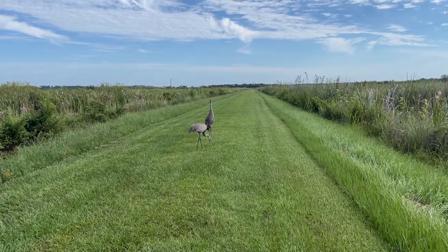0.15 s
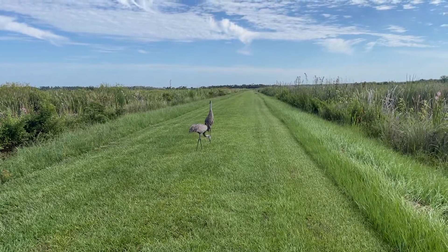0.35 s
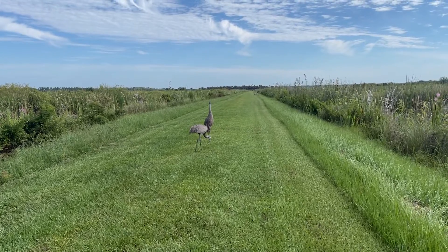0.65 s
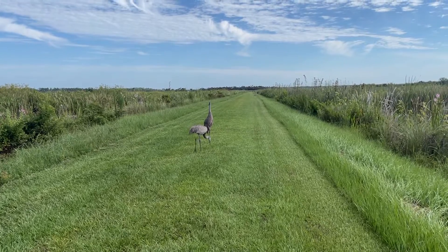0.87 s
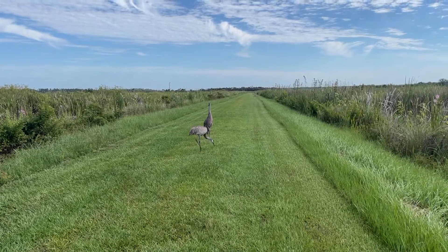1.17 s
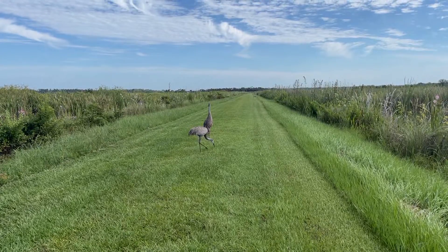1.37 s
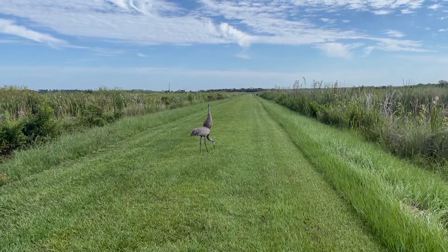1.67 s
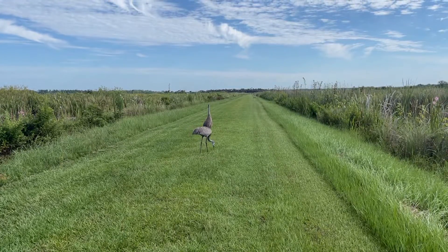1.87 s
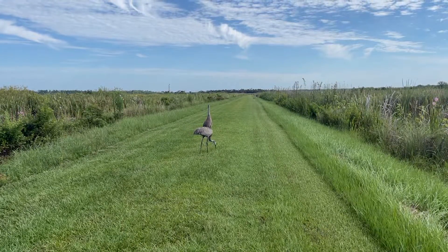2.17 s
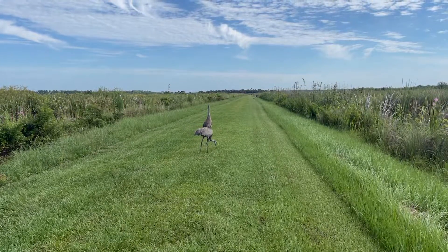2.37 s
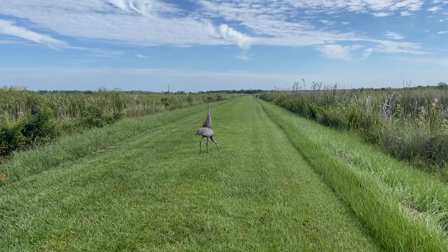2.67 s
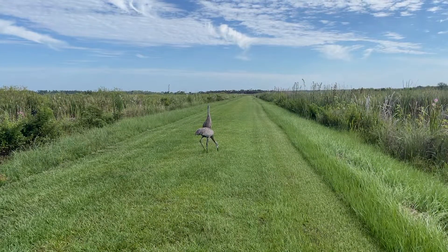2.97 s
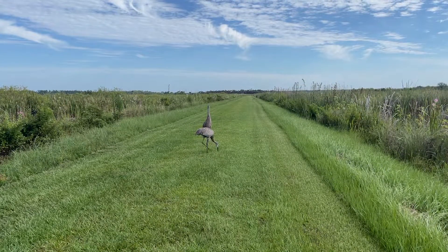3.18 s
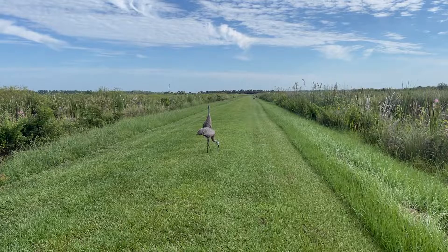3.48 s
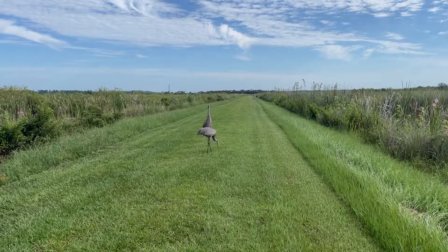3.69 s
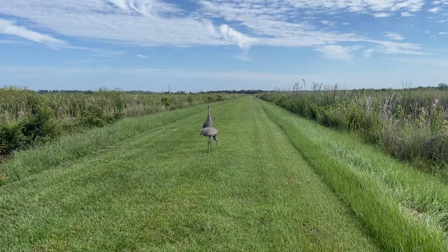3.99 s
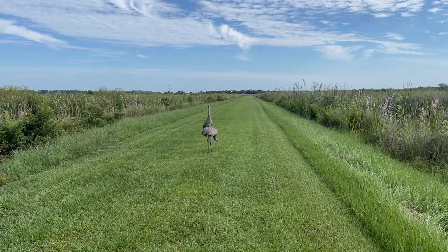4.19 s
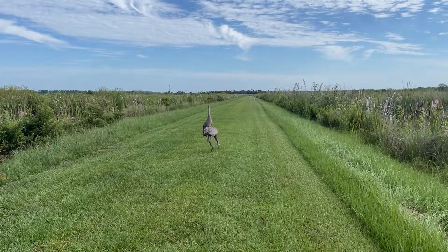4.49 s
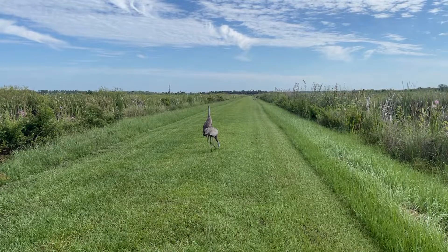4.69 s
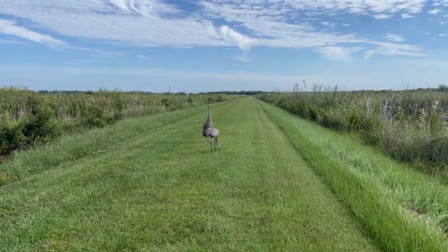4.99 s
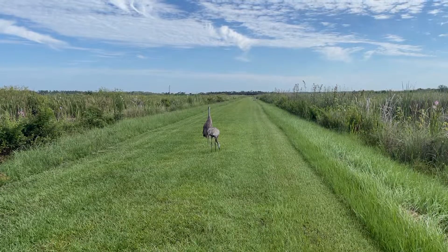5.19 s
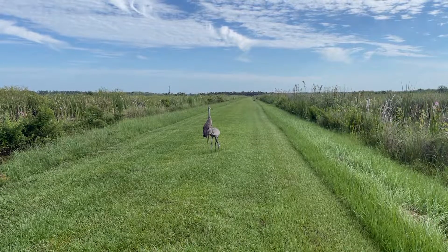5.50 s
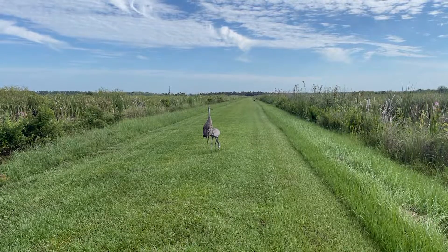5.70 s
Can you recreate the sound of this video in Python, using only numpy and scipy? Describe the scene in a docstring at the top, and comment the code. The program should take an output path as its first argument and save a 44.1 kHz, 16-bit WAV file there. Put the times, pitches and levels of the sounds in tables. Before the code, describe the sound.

In an open marsh, a katydid keeps up a high, fast drone while others buzz and tick over a soft hiss and the low rumble of far traffic. Small birds twitter and blackbirds whistle early on, followed by faint peeps. Near the end come clearer whistles, a raspy trill and one brief frog grunt. A phone picks it all up in stereo.

```python
"""Katydids on a marsh dyke

One katydid (a bush cricket) drones by scraping its wings in fast, gliding strokes; others buzz and tick.
Blackbirds whistle and trill, small birds peep and twitter, and a frog's throat pulses in one grunt.
Far traffic rumbles under the hiss of air and distant insects. Reeds and grass add short echoes.
A phone hears it all in stereo. The drone drops out briefly twice, the second time with a dry click."""
import sys
import numpy as np
from scipy import signal
from scipy.fft import rfft, irfft
from scipy.io import wavfile
from scipy.ndimage import uniform_filter1d

SR = 44100
rng = np.random.default_rng(int(sys.argv[2]) if len(sys.argv) > 2 else 0)


def to_wav(s):
    """Save 16-bit WAV."""
    ch = np.atleast_2d(s).T  # columns
    pcm = np.round(np.clip(ch, -1, 1) * 32767)  # PCM
    wavfile.write(sys.argv[1], SR, pcm.astype(np.int16))


N = 257984
T = np.arange(N) / SR
FREQ_HZ = np.arange(N // 2 + 1) * SR / N


def undb(db):
    """Turn decibels into a number to multiply by."""
    return 10 ** (np.asarray(db) / 20)


def level(x, db):
    """Scale a sound to an average (rms) level."""
    return x * undb(db) / np.sqrt(np.mean(x ** 2))


def curve(rows, at=T):
    """Join the rows of a table with straight lines, looked up by its first column."""
    points, *columns = np.transpose(rows)
    return [np.interp(at, points, column) for column in columns]


def ring(x, hz, width_hz):
    """A resonance: it keeps the sound near one pitch."""
    return signal.lfilter(*signal.iirpeak(hz, hz / width_hz, fs=SR), x)


def ring_twice(x, hz, width_hz):
    """A resonance with steeper sides."""
    return ring(ring(x, hz, width_hz), hz, width_hz)


def wander(rate_hz):
    """A smooth random wobble, about 1 in size."""
    hold = int(SR / rate_hz)
    steps = np.repeat(rng.standard_normal(N // hold + 1), hold)
    return 1.8 * uniform_filter1d(uniform_filter1d(steps, hold), hold)[:N]


def swell(peak_s, rise_s, fall_s, blunt=1.9):
    """One bell-shaped rise and fall; blunt flattens the top."""
    return np.exp(-np.abs((T - peak_s) / np.where(T < peak_s, rise_s, fall_s)) ** blunt)


def pulsing(rate_hz, sharp, start):
    """Repeating rounded pulses, from 0 to 1."""
    cycles = np.cumsum(rate_hz) / SR + start
    return (.5 - .5 * np.cos(2 * np.pi * cycles)) ** sharp


def flickering_noise(spectrum, flicker_db, rate_hz):
    """Two unrelated noises of one colour; each third of an octave flickers on its own."""
    hz, db = np.transpose(spectrum)
    octave = np.log2(FREQ_HZ + 1)
    colour = undb(np.interp(octave, np.log2(hz), db, left=-90, right=-90))
    noise = rfft(rng.standard_normal((2, N))) * colour
    out = 0
    for centre in np.arange(np.log2(hz[0]), np.log2(hz[-1]) + 1 / 3, 1 / 3):
        share = np.clip(1 - 3 * abs(octave - centre), 0, 1)
        out = out + undb(flicker_db * wander(rate_hz)) * irfft(noise * share, N)
    return level(out, 0)


def reed_echo(x, fade_s, wet_db):
    """The echo alone, scattered by reeds and grass; it drops 60 dB in fade_s."""
    t = T[:SR // 2]
    tail = rng.standard_normal((2, len(t))) * np.exp(-np.log(1000) * t / fade_s)
    tail *= undb(wet_db) / np.sqrt(np.sum(tail ** 2, axis=1, keepdims=True))
    return signal.fftconvolve(x, tail, axes=1)[:, :N]


def spread_to_stereo(main, unrelated):
    """The left side gets main; the right gets it out of step, mixed with unrelated sound."""
    # How alike left and right sound, and how far out of step, at each pitch:
    # pitch_hz, likeness (0-1), right_lead_radians, left_minus_right_db
    stereo_match = [(20, .9, .05, 1), (170, .96, .42, 1.6), (300, .9, 1.15, -.5), (520, .62, 1.9, -1.5),
                    (900, .45, 2.9, -2), (1300, .25, 2.9, 0), (2000, .3, 5.8, 0), (4000, .3, 6, 0),
                    (5500, .35, 6.6, 2), (6500, .2, 7.5, 0), (7100, .6, 8.9, 0), (7700, .999, 9.425, 0),
                    (8650, .999, 9.425, 0), (9150, .8, 10.2, 0), (9500, .93, 10.8, 0),
                    (10500, .93, 11.75, 0), (10950, 1, 12.566, 0), (12400, 1, 12.566, 0),
                    (13200, .5, 14.1, 0), (13650, .8, 15.3, 0), (14000, .999, 15.708, 0),
                    (16000, .999, 15.708, 0)]
    likeness, lead, pan_db = curve(stereo_match, FREQ_HZ)
    left = rfft(main)
    right = likeness * left * np.exp(1j * lead) + np.sqrt(1 - likeness ** 2) * rfft(unrelated)
    return irfft(np.array([left * undb(pan_db / 2), right * undb(-pan_db / 2)]), N)


def bird_tone(size, hz, pan_db):
    """A tone of moving pitch that reaches the microphones out of step; positive pan_db is left."""
    # How far the right side is ahead: pitch_hz, right_lead_radians
    leads = [(1600, 1.14), (1900, 8.6), (2300, 6.54), (3000, 4.83), (3300, 1.9), (3600, 4.76), (5000, 5.7)]
    phase = 2 * np.pi * np.cumsum(hz) / SR
    left = undb(pan_db / 2) * np.sin(phase)
    right = undb(-pan_db / 2) * np.sin(phase + curve(leads, hz)[0])
    return size * np.array([left, right])


def traffic():
    """Far traffic: a low rumble that slowly swells."""
    # Colour of the rumble: pitch_hz, relative_db
    spectrum = [(12, -46.5), (20, -29), (37, -7), (59, -4), (171, -2.5), (184, -4), (219, -18.5),
                (310, -16), (333, -16.5), (376, -25), (410, -26), (489, -25.5), (646, -36), (840, -42),
                (1300, -52), (1690, -60), (2860, -120)]
    # Its swell: time_s, level_db
    loudness = [(0, -51), (1.3, -50), (1.7, -49), (3.4, -48), (3.58, -50), (3.75, -46), (3.9, -48),
                (5.0, -48.5), (5.85, -50)]
    rumble = flickering_noise(spectrum, flicker_db=.93, rate_hz=6)
    return rumble * undb(curve(loudness)[0] + .35 * wander(5.08))


def hiss():
    """Air and distant insects blend into a hiss."""
    # Colour of the hiss: pitch_hz, relative_db
    spectrum = [(600, -8), (900, -10), (1200, -14.5), (1800, -15.5), (2300, -6.5), (2800, -3.5),
                (3300, -5.5), (3900, -6), (4400, -3.5), (4900, -3), (5500, 0), (6000, -0.5), (6700, -3),
                (7800, -6), (9000, 2), (10500, 6), (11500, -0.5), (12400, -1.5), (13000, -4), (13700, -4),
                (14500, -7), (16000, 0.5)]
    return flickering_noise(spectrum, flicker_db=.9, rate_hz=14) * undb(-60.5)


def click():
    """One dry click, like a cut in the sound: the signal steps down and recovers."""
    start_s, recovery_s = 2.5447, .003
    step = -undb(-42) * (T >= start_s) * np.exp(-np.abs(T - start_s) / recovery_s)
    return signal.sosfilt(signal.butter(2, 8000, fs=SR, output="sos"), step)


def twitter():
    """A far bird's pairs of chirps, one falling and one rising, sink and speed up over a softer note."""
    # The two chirps: middle_cycles, drift_cycles_per_s, half_length_cycles, sweep_hz
    pair = [(.79, .13, .17, -1300), (.34, -.09, .22, 950)]
    bout = swell(peak_s=.6, rise_s=.8, fall_s=.72, blunt=2.4) * undb(-63.5)
    pairs_per_s, centre_hz = 10.25 + 1.75 * T, 5170 - 290 * T
    cycles = np.cumsum(pairs_per_s) / SR
    dry = 0
    for middle, drift, half, sweep_hz in pair:
        turns = cycles - middle - drift * T + 1.5
        place = np.clip((turns % 1 - .5) / half, -1, 1)  # -1 to 1 through each chirp
        size_luck, pitch_luck = rng.standard_normal((N // 1000, 2))[turns.astype(int)].T
        size = bout * undb(1.46 * size_luck) * (1 - place ** 2)
        chirp_hz = centre_hz + 70 * pitch_luck + sweep_hz * place / 2 + 130 * wander(900)
        low_note = bird_tone(size * undb(-8), 2950 + 70 * wander(600), pan_db=-4)
        dry = dry + bird_tone(size, chirp_hz, pan_db=2.7) + low_note
    return dry + reed_echo(dry, fade_s=.28, wet_db=-1.5)


def peeps(rough):
    """A far bird peeps, each note sliding upward."""
    # The peeps: peak_s, pitch_hz
    notes = [(2.28, 2330), (2.492, 2340), (2.676, 2350), (2.505, 2640), (2.7, 2780), (2.81, 2900),
             (2.898, 2570), (3.11, 2370), (3.326, 2330), (3.55, 2600), (3.768, 2310)]
    out = 0
    for (peak_s, hz), db in zip(notes, rng.normal(-72.5, 1, len(notes))):
        pitch_hz = hz + 6000 * np.clip(T - peak_s, -.03, .03) + 40 * rough
        out += bird_tone(undb(db) * swell(peak_s, .011, .011), pitch_hz, pan_db=-1.6)
    return out


def chucks(rough):
    """Bird notes so short that they sound like "chuck"."""
    # The calls: peak_s, level_db, pitch_hz, rise_s
    calls = [(4.003, -65, 2620, 0.0062), (3.998, -68.5, 1706, 0.0092), (4.105, -66, 990, .003),
             (4.429, -54, 2200, .003), (4.446, -56, 2165, 0.0035), (4.463, -57, 2150, 0.0035),
             (4.503, -55.5, 3780, 0.002), (4.781, -54, 5530, 0.0032), (5.648, -73.5, 1770, 0.01)]
    return sum(bird_tone(undb(db) * swell(peak_s, rise_s, 1.6 * rise_s), hz + 60 * rough, pan_db=-1.6)
               for peak_s, db, hz, rise_s in calls)


def whistles(rough):
    """Blackbirds whistle almost pure tones that glide and waver."""
    # The notes: peak_s, rise_s, fall_s, pitch_hz, glide_hz_per_s, level_db, rasp_hz, left_minus_right_db
    notes = [(0.63, 0.031, 0.032, 1622, 501, -65, 5, -1), (.71, 0.0096, 0.016, 1410, -2000, -79.5, 20, -5),
             (0.801, .02, 0.04, 2575, 802, -55.5, 10, 0), (.8, .02, 0.036, 2355, -300, -68.5, 35, 6),
             (.893, 0.014, 0.055, 2997, -300, -60, 10.5, -5), (.886, .01, .035, 3340, 1000, -69.5, 39, 3),
             (1.02, .1, .4, 2990, -59.5, -73, 25, -7), (1.45, 0.014, 0.073, 2547, 501, -68.5, 26, -2),
             (1.46, 0.013, 0.031, 2260, 1, -73.5, 150, 2), (4.195, .028, 0.058, 2415, -200, -57, 5, 7.5),
             (4.31, 0.0092, .06, 2415, -400, -72.5, 10, -2), (4.322, 0.015, 0.014, 1536, 3499, -71, 10, -2),
             (4.53, 0.023, .035, 1735, 500, -71.5, 10, 0), (4.53, 0.02, 0.023, 3430, 600, -47, 8, 6),
             (4.547, .035, .03, 5170, 2001.5, -69, 40, 12), (4.615, 0.03, .02, 3420, 300.5, -63, 10, 0),
             (4.636, 0.03, 0.04, 2680, 300.5, -50, 8.6, 1), (4.725, .05, 0.04, 2760, 299, -61.5, 12, -1),
             (4.71, 0.048, 0.033, 5260, -1, -69.5, 41, 7), (4.72, .03, 0.028, 5000, 300.5, -70, 40, 4),
             (4.71, .03, 0.045, 3060, 1001, -66.5, 12, 0), (4.732, 0.011, 0.016, 3450, -500, -63.5, 20, 8),
             (5.307, .014, 0.015, 2660, -1, -54.5, 20, -1), (5.35, .03, 0.082, 2800, -1500, -73, 87, 0),
             (5.32, .015, .015, 3650, 0, -69, 90, 6), (5.4, .06, .12, 3550, 0, -75, 200, 4),
             (4.64, .03, .04, 2430, 299.5, -69, 60, 0), (4.56, .02, 0.016, 3800, 5001, -69, 40, 4)]
    waver = undb(.7 * wander(30))
    out = 0
    for peak_s, rise_s, fall_s, hz, glide, db, rasp_hz, pan_db in notes:
        pitch_hz = hz + glide * np.clip(T - peak_s, -2 * rise_s, 2 * fall_s) + rasp_hz * rough
        size = np.sqrt(2) * undb(db) * waver * swell(peak_s, rise_s, fall_s, blunt=2.6)
        out += bird_tone(size, pitch_hz, pan_db)
    return out


def trill():
    """A blackbird's raspy trill: fast pulses whose pitch rises, then droops."""
    # Its tones: pitch_ratio, relative_db, growth_db_per_s, rasp_share_of_pitch, left_minus_right_db
    tones = [(1, 0, 3, .018, -2.5), (1.18, -7, 10, .04, 6), (1.3, -12, 10, .04, 6), (1.72, -11, 8, .025, 4),
             (1.84, -7, 4, .018, 4)]
    start_s, top_s, end_s, edge_s = 4.77, 5.1, 5.295, .026
    from_top_s = np.clip(T, start_s, end_s) - top_s
    hz = 2994 - 1400 * from_top_s ** 2
    fade = np.clip(np.minimum(T - start_s, end_s - T) / edge_s, 0, 1)
    size = 2.1 * undb(-62 + 1.3 * wander(90)) * fade
    size *= pulsing(rate_hz=76.9 + 3 * wander(30), sharp=.8, start=.6)
    out = 0
    for ratio, db, growth, rasp, pan_db in tones:
        pitch_hz = ratio * hz * (1 + rasp * wander(1500))
        out += bird_tone(size * undb(db + growth * from_top_s), pitch_hz, pan_db)
    return out


def birds():
    """Whistles, peeps, chucks and the trill echo from the reeds."""
    rough = wander(500)  # a fast pitch wobble, heard as rasp
    dry = whistles(rough) + peeps(rough) + chucks(rough) + trill()
    return dry + reed_echo(dry, fade_s=.33, wet_db=-14.5)


def frog():
    """One grunt: pulses with a noisy rattle make the throat and its sac ring."""
    # Throat resonances: pitch_hz, width_hz, relative_db
    throat = [(322, 150, 2), (434, 140, -2), (710, 320, -22), (1300, 300, -17), (1960, 480, 1.5),
              (2200, 390, -5), (2750, 340, -2)]
    pulse_hz = 63
    cycles = pulse_hz * T + .32
    rattle = .2 * np.exp(-(cycles % 1) / .5) * rng.standard_normal(N)
    pulses = np.diff(np.floor(cycles), prepend=0) + rattle
    voice = sum(undb(db) * ring_twice(pulses, hz, width_hz) / width_hz for hz, width_hz, db in throat)
    grunt = level(voice, -52.5) * swell(peak_s=5.29, rise_s=.034, fall_s=.056)
    dry = np.array([np.roll(grunt, 20) * undb(-2), grunt * undb(2)])  # the right hears it first
    return dry + reed_echo(dry, fade_s=.17, wet_db=-8.5)


def katydid_ticks(noise):
    """Single wing strokes: short bursts of noise coloured by the ringing wing."""
    # The ticks: start_s, strength_db
    ticks = [(.38, -60), (.444, -58), (.509, -59), (.576, -58), (.638, -59), (.708, -59), (.782, -59),
             (.867, -57), (.958, -56), (1.127, -57), (1.197, -55), (1.267, -55.5), (1.339, -59),
             (5.102, -59), (5.173, -56), (5.242, -57), (5.305, -56), (5.372, -58), (5.438, -56),
             (5.511, -58), (5.576, -56.5), (5.652, -57)]
    rise_s, fall_s = .002, .012
    bursts = 0
    for start_s, db in ticks:
        age_s = np.maximum(T - start_s, 0)
        bursts += undb(db) * (1 - np.exp(-age_s / rise_s)) * np.exp(-age_s / fall_s)
    wing = ring_twice(noise, 12000, 8400) + undb(4) * ring(noise, 11700, 1300)
    return level(wing, 5.3) * bursts


def katydid_buzz(noise):
    """About 50 noisy strokes a second make another katydid's wings ring."""
    # How loud the buzz is: time_s, level_db
    loudness = [(0, -71), (.4, -70), (.75, -68), (1.1, -73), (1.4, -74), (1.7, -67.5), (2.5, -63),
                (3, -61.5), (3.5, -64.5), (4.2, -66.5), (4.65, -67.5), (4.85, -90), (5.4, -82), (5.85, -70)]
    wing = ring_twice(noise, 11660, 1500) + undb(-6.5) * ring_twice(noise, 12900, 1000)
    strokes = pulsing(rate_hz=49.87 + .15 * wander(.67), sharp=.61, start=.3)
    flicker = undb(.91 * wander(45))
    return level(wing * strokes * flicker, curve(loudness)[0])


def katydid_drone():
    """Each scrape of the near katydid's wing is a tone that glides up and down; far ones blur."""
    # Two brief dropouts where the sound cuts and the drone jumps: time_s, lost_cycles, dip_db
    dropouts = [(1.008, .255, -10), (2.545, .35, -1)]
    strokes_per_s, top_hz, sag_hz, level_db = 69.7, 10454, 1298, -55
    cycles = .835 + strokes_per_s * T + .126 * np.maximum(T - 4.5, 0)  # a little faster after 4.5 s
    cycles -= sum(lost * (T > time_s) for time_s, lost, _ in dropouts)
    place = np.clip((cycles % 1 - .52) / .36, -1, 1)  # -1 to 1 through each stroke
    pitch_luck, phase_luck, size_luck = rng.standard_normal((N // 400, 3))[cycles.astype(int)].T
    hz = (top_hz - sag_hz * place ** 2) * (1 + .00401 * pitch_luck)
    phase = 2 * np.pi * np.cumsum(hz) / SR + 2 * phase_luck
    scrape_db = 11 * place ** 2 - 2 * place  # harder towards both ends, most at the start
    size = (1 - place ** 2) ** .78 * undb(scrape_db + .13 * size_luck)
    rasp = undb(1.5 * wander(700))  # uneven teeth on the wing
    near = level(size * rasp * np.sin(phase), 0)
    noise = rng.standard_normal((2, N))
    chorus = ring_twice(noise, 10250, 500) + undb(-3) * ring_twice(noise, 9750, 500)
    heard = reed_echo(np.array([near, near]), fade_s=.024, wet_db=-12) + level(chorus, -8)
    heard[0] += near  # the direct sound goes in the main row only
    dips_db = sum(db * swell(time_s, .011, .011) for time_s, _, db in dropouts)
    return heard / np.std(heard[0]) * undb(level_db + dips_db)


def scene():
    """Traffic and insects are spread around; birds, frog and click have their own places."""
    spread = traffic() + hiss() + katydid_drone()
    buzz_noise, tick_noise = rng.standard_normal((2, 2, N))
    spread += katydid_buzz(buzz_noise) + katydid_ticks(tick_noise)
    return spread_to_stereo(*spread) + birds() + twitter() + frog() + click()


def record(dry):
    """The phone steeply cuts the highest treble."""
    top_hz = 15700
    return signal.sosfilt(signal.ellip(10, .2, 80, top_hz, fs=SR, output="sos"), dry)


dry = scene()
out = record(dry)
to_wav(out)
```